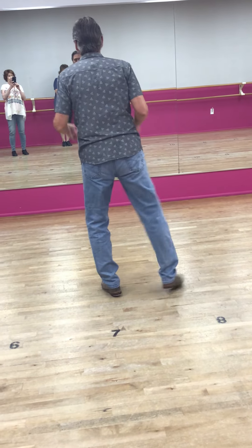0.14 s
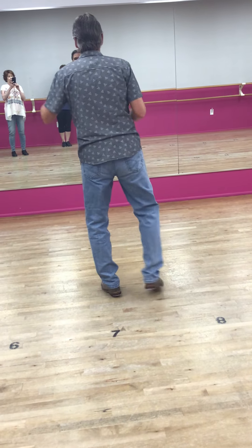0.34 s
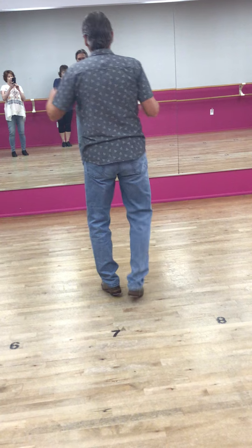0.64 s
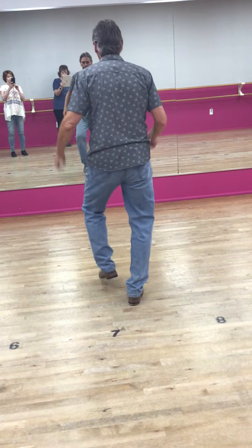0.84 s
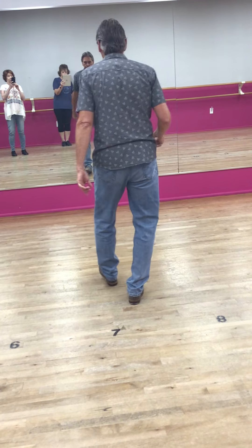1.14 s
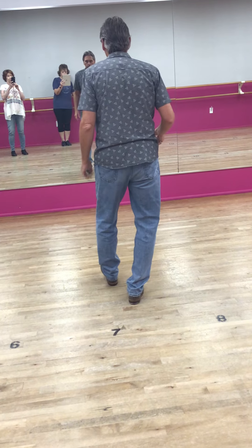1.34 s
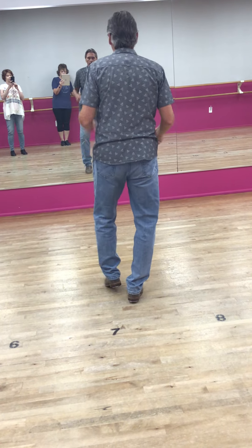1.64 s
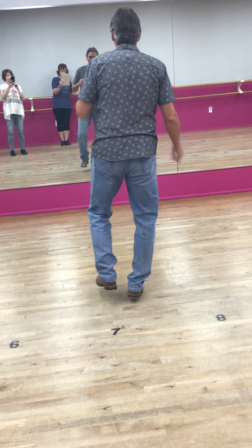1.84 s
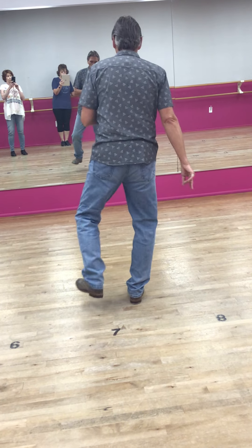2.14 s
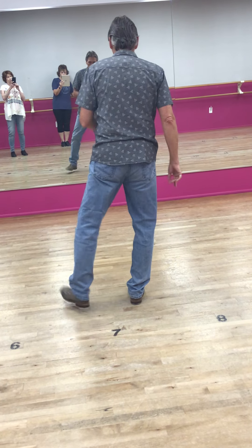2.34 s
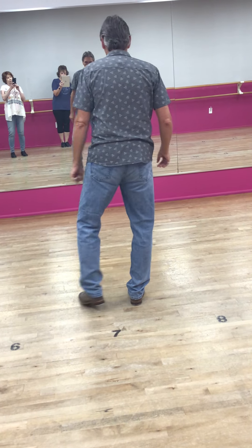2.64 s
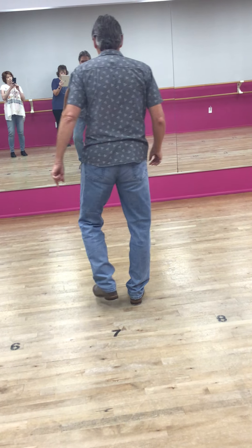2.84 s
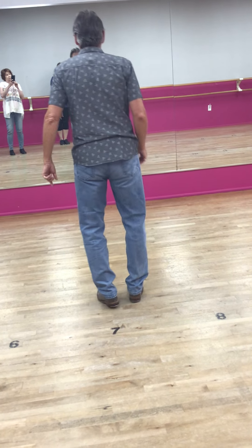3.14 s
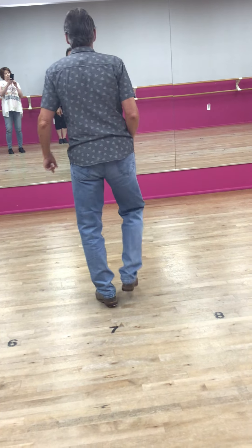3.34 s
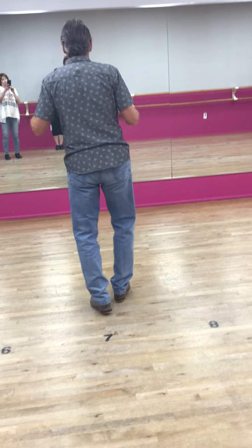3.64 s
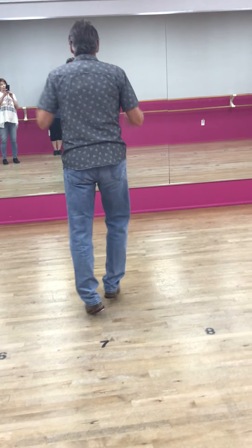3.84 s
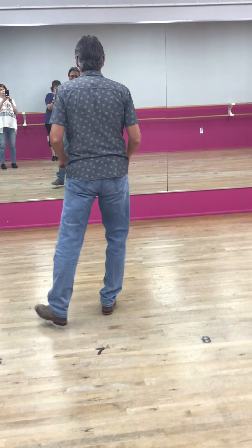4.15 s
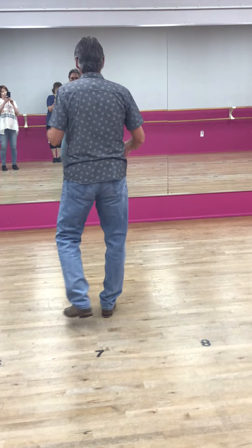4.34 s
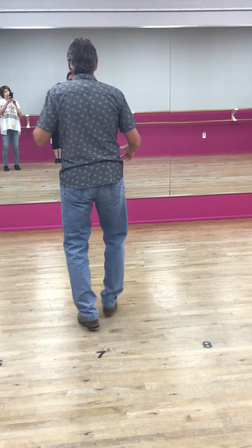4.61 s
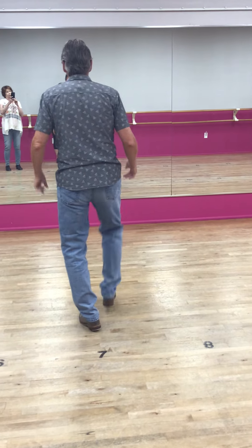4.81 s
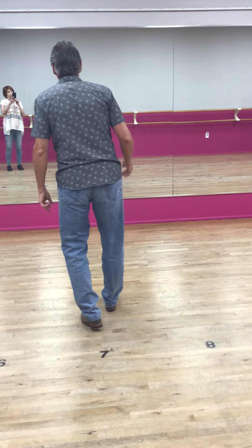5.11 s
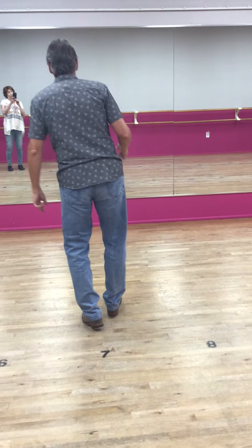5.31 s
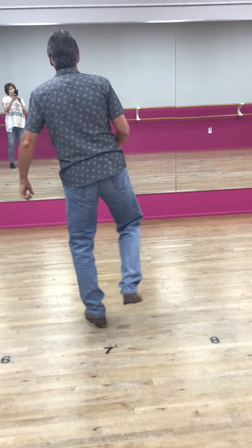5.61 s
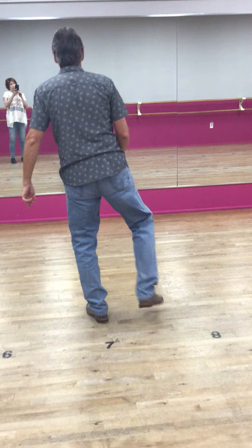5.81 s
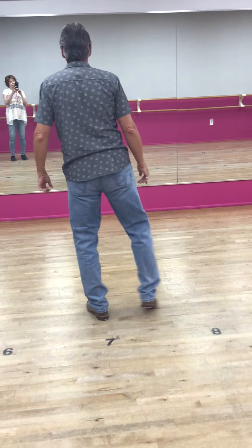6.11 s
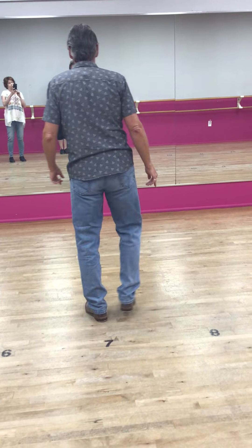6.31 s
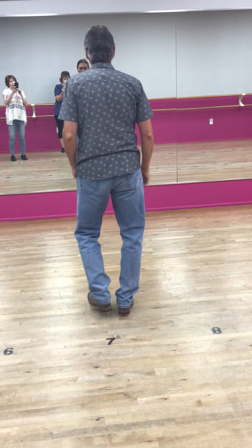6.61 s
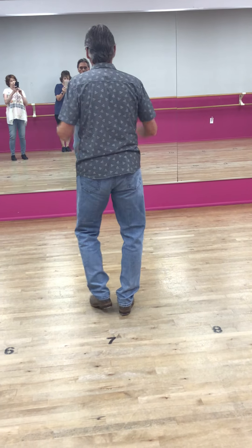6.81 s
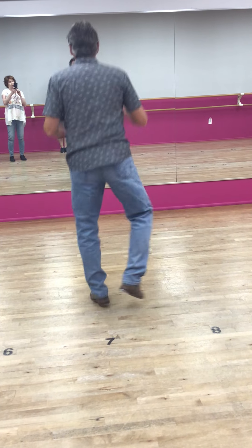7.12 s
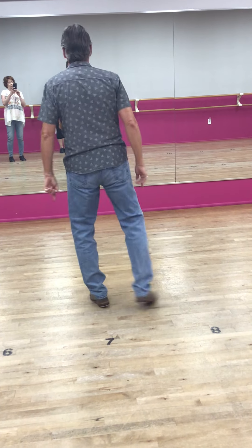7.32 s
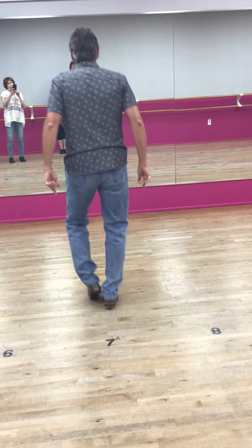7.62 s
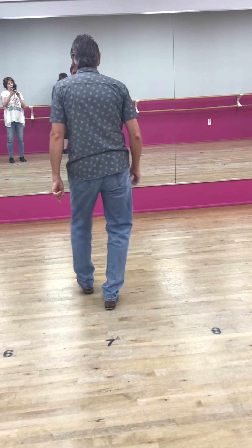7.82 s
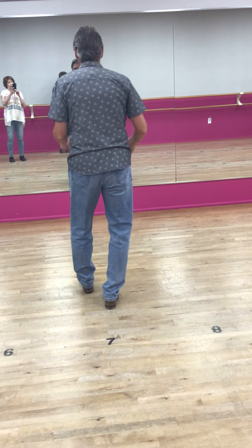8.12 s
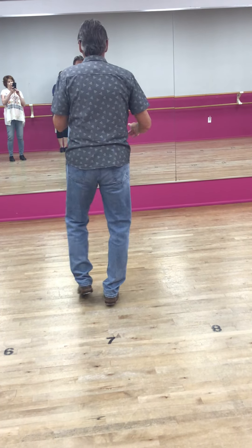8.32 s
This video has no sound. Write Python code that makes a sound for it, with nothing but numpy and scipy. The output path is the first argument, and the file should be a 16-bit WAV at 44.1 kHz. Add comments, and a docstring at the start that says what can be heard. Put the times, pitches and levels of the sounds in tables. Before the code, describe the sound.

Crisp metal-plated shoe taps on hollow wooden boards, two to four a second, ringing briefly off the hard walls of an empty-sounding room.

```python
"""A dancer in tap shoes steps on the sprung wooden floor of a bare studio, a few metres from a phone.
Each blow excites resonances: the steel plates and sole clack, planks knock and boards thud.
Mirror, ceiling and walls return a few sharp echoes, then a dense tail of decaying noise bands.
Soft weight shifts sound the boards alone; faint ventilation is filtered noise, slowly wavering."""
import sys
import numpy as np
from scipy import signal
from scipy.fft import rfft, irfft, next_fast_len
from scipy.io import wavfile
from scipy.ndimage import uniform_filter1d

SR = 44100
rng = np.random.default_rng(int(sys.argv[2]) if len(sys.argv) > 2 else 0)


def wav_out(sig):
    """Save sig, one row per channel (or a flat mono array), as 16-bit PCM at SR to the path in sys.argv[1]."""
    wavfile.write(sys.argv[1], SR, np.round(np.clip(np.atleast_2d(sig).T, -1, 1) * 32767).astype(np.int16))


N = 373086
LEAD = SR // 5  # samples computed ahead of time zero, for a blow that starts earlier
PLACES = 6  # spots on the floor, each with its own room response


def undb(db):
    """Decibel law: level in dB to amplitude gain."""
    return 10 ** (np.asarray(db) / 20)


def ring(modes, db, chance, detune):
    """Modal resonance: power spectrum of struck modes; db is the rms if all came within 10 ms."""
    hz, mode_db, t60 = np.transpose(modes)[:, :, None]
    count = len(hz)
    # each blow shifts the pitches and levels of the modes a little
    hz = hz * (1 + detune * chance[::-1][:count, None])
    mode_db = mode_db + 0.58 * chance[:count, None]
    f = np.fft.rfftfreq(SR // 2, 1 / SR) + 1
    width = np.log(1000) / (2 * t60)
    # contact and plate resonate in series, so the flanks fall steeply
    resonance = 1 / (1 + ((f - hz ** 2 / f) / width) ** 2) ** 2
    power = np.sum(undb(2 * mode_db) / width * resonance, axis=0)
    return power * undb(2 * db) * (SR / 100) * len(f) / power.sum()


def blow(power):
    """Minimum phase: the causal, most sudden sound that has this power spectrum."""
    cepstrum = irfft(np.log(power) / 2)
    half = len(cepstrum) // 2
    # folding the cepstrum onto positive time makes the sound causal
    cepstrum[1:half] *= 2
    cepstrum[half + 1:] = 0
    return irfft(np.exp(rfft(cepstrum)))[:half]


def push(x, seconds):
    """Contact time as a low-pass: a softer contact is a longer, rounder push."""
    w = np.hanning(int(seconds * SR) + 3)
    return np.convolve(x, w / w.sum())[:len(x)]


def late(x, seconds):
    """Pure delay: the same sound, starting later."""
    return np.roll(x, int(seconds * SR))


def add(track, s, x):
    """Superposition: mixes a sound in at a time in seconds."""
    i = LEAD + int(s * SR)
    track[i:i + len(x)] += x[:len(track) - i]


# Modes of the toe and heel plates. Each row: frequency in Hz and T60 in s (both before the
# ratios of each blow), with the relative level in dB between them.
TOE = [(3416, -15, .004), (4317, 3, 0.0021), (6770, -10.5, 0.0021)]
HEEL = [(2890, 4.5, 0.0035), (4900, -11, 0.0032), (5980, -5.5, 0.0018)]
SOLE_T60_S = 0.0043  # before the ring length ratio


def clacks(length, sole_hz, sole_db, pitch, toe_db, heel_db, chance):
    """Sequential impact: sole, heel and toe plate clack; returns their sum and total power spectrum."""
    sole = [(sole_hz, 0, length * SOLE_T60_S)]
    # a plate pressed harder to the floor rings higher; one that leaves at once rings longer
    heel = np.array(HEEL) * (pitch, 1, length)
    toe = np.array(TOE) * (pitch, 1, length)
    x, total = 0, 0
    parts = ((sole, sole_db, 1), (heel, heel_db, -1), (toe, toe_db, 1))
    for modes, db, polarity in parts:
        spectrum = ring(modes, db, chance, 0.0081)
        # the plate edge touches first, so lower parts speak later
        x = x + polarity * late(blow(spectrum), .7 / modes[0][0])
        total = total + spectrum
    return x, total


# Modes of the sprung boards. Each row: frequency in Hz, relative level in dB, T60 in s.
BOARDS = [(126, -2, 0.093), (178, -17, 0.035), (182.2, -5, 0.1), (230, 2, 0.04), (257.3, -1, 0.049),
          (325.7, -3, .06)]


def thud(db, chance, detune, contact_s):
    """Plate vibration: the boards sound their low modes, rounded by the contact time."""
    return push(blow(ring(BOARDS, db, chance, detune)), contact_s)


# High modes of the steel, then modes of the planks. Each row: frequency in Hz, relative level in dB,
# T60 in s.
PLATE = [(8790, 5.5, 0.004), (10800, -8, 0.0029), (12900, -8.5, 0.0025), (15300, -20.5, .003)]
PLANKS = [(410, 6, 0.02), (597, 2.5, 0.011), (740, -1.5, 0.0036), (1190, -19.5, 0.0033)]
SHARED_COLOUR = 0.33  # share of the room's sound that keeps the hollows between the clacks


def tap(row, room_db, chance):
    """Directivity: one blow as sent towards the phone, and averaged over all directions for the room."""
    length, knock_db, sole_hz, sole_db, pitch, toe_db, heel_db, treble_db, thud_db = row
    clack, clack_power = clacks(length, sole_hz, sole_db, pitch, toe_db, heel_db, chance)
    treble = ring(PLATE, treble_db, chance, .02)
    knock = ring(PLANKS, knock_db, chance, .03)
    low = thud(thud_db, chance, 0.011, 0.0021)
    x = clack + blow(treble) + late(blow(knock), 0.00071)
    total = clack_power + treble + knock
    # parts interfere towards the phone, but their powers add over many directions
    interfering = abs(rfft(x, SR // 2)) ** 2
    around = blow(SHARED_COLOUR * interfering + (1 - SHARED_COLOUR) * total + 1e-18)
    # the bass spreads evenly, whichever way the shoe faces
    return x - low, undb(room_db) * around - low


# legs and shoes throw a short rattle after the direct blow
SCATTER_DB, SCATTER_T60_S = -6, 0.04
# nearby surfaces: delay in ms, level in dB before half the room level and a small random change
NEAR_ECHO_MS, NEAR_ECHO_DB = (5.6, 8.3), (-16, -15.5)


def close_by(x, room_db, noise, chance):
    """Scattering and reflection: direct blow, a rattle off legs and shoes, two nearby echoes."""
    path = noise * 1000. ** (-np.arange(len(noise)) / SR / SCATTER_T60_S)
    path = path * undb(SCATTER_DB) / np.sqrt(np.sum(path ** 2))
    path[0] = 1  # direct sound
    for ms, db, c in zip(NEAR_ECHO_MS, NEAR_ECHO_DB, chance):
        path[int(ms * SR / 1000)] += undb(db + room_db / 2 + 2 * c)
    return signal.fftconvolve(x, path)


# Blows of the shoes. Each row: start in seconds, shift of each wall echo from their mean delay in ms,
# ring length ratio, knock level in dB, sole clack in Hz, sole clack level in dB, plate pitch ratio,
# toe plate level in dB, heel plate level in dB, treble level in dB, thud level in dB,
# room level in dB (all of the blow but its thud).
TAPS = [(-0.0602, .15, 0.84, -40, 1550, -33, 1.05, -40, -23, -51.5, -36, 0),
        (0.112, .1, 0.79, -49.5, 1480, -32.5, 1, -50, -33, -55.5, -43.5, -0.5),
        (0.3008, .1, 0.98, -49.5, 1490, -35, 0.95, -27.5, -39, -41, -37.5, 0),
        (0.6757, .1, 1.09, -42.5, 1690, -30, 1.046, -27.5, -40.5, -39.5, -35.5, 2),
        (1.0298, 1.5, 1.13, -43.5, 1210, -51.5, 0.93, -77, -38.5, -59, -34.5, 5.5),
        (1.6749, .8, 0.5, -41.5, 1700, -36, 0.98, -37.5, -39.5, -50, -32, 4),
        (2.0238, .1, 1.24, -48.5, 1190, -51.5, .92, -73, -38.5, -63, -36, -1),
        (2.295, .1, 0.92, -41, 1500, -32, 1.206, -37.5, -29, -52.5, -33.5, -1.5),
        (2.6209, .2, .8, -41, 1650, -33.5, 1.01, -33.5, -37.5, -48, -27, 2),
        (2.972, .1, 0.7, -40, 1240, -34.5, 0.85, -28, -32.5, -43.5, -27, 1.5),
        (3.59, .1, 1.06, -44, 1696, -30, 0.99, -30.5, -39.5, -44.5, -37.5, 1.5),
        (3.907, .1, 0.91, -42, 1680, -34.5, 1.03, -29.5, -49, -41, -31.5, 5),
        (4.0611, .1, 0.96, -41.5, 1420, -37, 1.19, -48, -30.5, -69, -36.5, -1.5),
        (4.2394, .1, 1.08, -44, 1540, -35, 1.03, -26, -40, -39.5, -33, 0.5),
        (4.5587, .1, 0.71, -45, 1680, -34, .97, -30, -56, -48.5, -30, 4),
        (4.8985, 1.5, .8, -42, 2030, -40.5, 0.96, -69, -35.5, -54.5, -33.5, 5.5),
        (5.409, .1, 0.85, -42.5, 1725, -30, 1.035, -28, -35.5, -40.5, -34, 1),
        (5.6761, .1, 0.71, -60, 960, -50.5, 0.76, -55, -46.5, -69, -44.5, 0.5),
        (5.8844, .1, 0.94, -45, 1605, -30, 1, -41.5, -29, -45, -41.5, -1.5),
        (6.1194, .1, 1.34, -51, 1520, -32, 1.01, -30.5, -34.5, -44.5, -40.5, 0.5),
        (6.3802, .1, 0.97, -39, 2030, -32.5, .97, -29.5, -59, -47.5, -32, 2),
        (6.8236, .1, 0.64, -43.5, 1760, -34.5, 1, -36.5, -27.5, -51, -32.5, 1),
        (7.1003, .1, 0.62, -41, 1750, -35.5, 0.97, -34, -27.5, -48.5, -32, 1),
        (7.2023, .1, 1.5, -44, 1640, -32, 1.15, -38, -42.5, -49, -40, -1.5),
        (7.3435, .1, 1.18, -49, 1434, -33.5, .95, -32.5, -53, -52.5, -41, 0.5),
        (7.5752, .1, 0.92, -43, 1670, -28.5, 1.01, -28, -37, -42.5, -37.5, -0.5),
        (7.8437, 1.5, 0.82, -43.5, 1080, -53.5, 0.97, -62, -38.5, -65, -34, 7),
        (8.3122, .1, 0.84, -43.5, 1827, -28, 1, -36, -25, -78, -39, -1)]
WALL_ECHO_MS, WALL_ECHO_DB = 13.5, (-7, -16.5)  # mean delay of a pair of walls; level of each


def taps(near, sent):
    """Specular reflection: adds each blow and its two wall echoes, and sends it into the room."""
    draws = rng.standard_normal((len(TAPS), SR // 40))
    for k, ((s, split_ms, *row, room_db), draw) in enumerate(zip(TAPS, draws)):
        x, around = tap(row, room_db, draw[:6])
        add(near, s, close_by(x, room_db, draw[8:], draw[6:8]))
        # two walls answer together, or apart when the foot lands off centre
        for side, db in zip((-1, 1), WALL_ECHO_DB):
            echo = push(undb(db) * around, 0.0002)
            add(near, s + (WALL_ECHO_MS + side * split_ms) / 1000, echo)
        add(sent[k % PLACES], s, around)


# Lone echoes of far walls: delay in ms before a random shift, and level in dB before a random change.
FAR_ECHO_MS = (21.5, 33, 36.5, 50.5, 56.2)
FAR_ECHO_DB = (-27, -17.5, -17.5, -13.5, -20)
# Dense tail. Each row: frequency in Hz, T60 in s, energy in dB above the sound sent into the room.
TAIL = [(60, 0.48, -1.5), (122, 0.47, 7.5), (247, 0.92, 2.5), (495, 0.87, 2.5), (930, 0.61, 3.5),
        (1950, 0.65, -2.5), (3850, 0.72, -2.5), (8900, 0.54, -2), (16100, 0.35, -4.5)]
TAIL_START_S, TAIL_RISE_S = .011, 0.0034  # onset and time constant of the build-up


def studio():
    """Reverberation: late response from one place, lone echoes in noise that dies band by band."""
    t = np.arange(SR) / SR
    out = np.zeros(SR)
    changes = rng.standard_normal((len(FAR_ECHO_MS), 2))
    for ms, db, (shift, gain) in zip(FAR_ECHO_MS, FAR_ECHO_DB, changes):
        out[int(ms * (1 + shift / 100) * SR / 1000)] = undb(db + 1.5 * gain)
    out = push(out, .0001)

    # reflections come in clumps at first and merge as they multiply
    clumps = np.interp(t, np.arange(700) / 700, rng.standard_normal(700))
    patchy = undb(4.3 * clumps * np.exp(-t / 0.1))
    noise = rng.standard_normal(SR) * patchy
    # even out the power over 50 ms, so that only the clumping remains
    noise = rfft(noise / np.sqrt(uniform_filter1d(patchy ** 2, size=SR // 20)))

    rise = 1 - np.exp(-np.maximum(t - TAIL_START_S, 0) / TAIL_RISE_S)
    hz, t60, db = np.transpose(TAIL)
    octaves = np.log2(np.fft.rfftfreq(SR, 1 / SR) + 1)
    # overlapping triangular bands half an octave apart
    for centre in np.arange(5.5, 15, .5):
        band = irfft(noise * np.clip(1 - 2 * abs(octaves - centre), 0, 1))
        shape = rise * 1000. ** (-t / np.interp(centre, np.log2(hz), t60))
        gain = undb(np.interp(centre, np.log2(hz), db)) / np.sqrt(np.sum(shape ** 2))
        out = out + band * shape * gain
    return out


# Spectrum of the air noise. Each row: frequency in Hz, relative level in dB per Hz.
AIR = [(25, -43), (40, -26.5), (59, -10.5), (75, -12.5), (100, -24), (210, -17), (400, -43.5), (800, -36),
       (3000, -45.5), (8000, -63.5), (16000, -77)]
AIR_DB = -68  # rms level about which the waver moves


def ventilation():
    """Shaped broadband noise: steady rumble with a hump near the mains frequency, wavering slowly."""
    hz, db = np.transpose(AIR)
    size = next_fast_len(N)
    f = np.fft.rfftfreq(size, 1 / SR) + 1
    gain = undb(np.interp(np.log(f), np.log(hz), db))
    x = irfft(rfft(rng.standard_normal(size)) * gain, size)[:N]
    waver = np.interp(np.arange(N), np.linspace(0, N, 25), rng.standard_normal(25))
    return x / x.std() * undb(AIR_DB + 3.4 * waver)


# Soft weight shifts, no steel. Each row: start in seconds, level in dB.
STEPS = [(2.506, -57), (2.832, -48.5), (3.183, -72), (4.45, -53.5), (5.27, -51.5)]


def weight_shifts(near, sent):
    """Soft excitation: a slow contact drives the boards alone, heard directly and through the room."""
    chances = rng.standard_normal((len(STEPS), 6))
    for k, ((s, level_db), chance) in enumerate(zip(STEPS, chances)):
        x = thud(level_db, chance, 0.037, 0.0024)
        add(near, s, x)
        add(sent[k % PLACES], s, x)


FLOOR_LOW_HZ = 98.5  # the boards radiate little below their first mode


def scene():
    """Superposition: early sound, the room's answer by convolution, and the ventilation."""
    near = np.zeros(LEAD + N)
    sent = np.zeros((PLACES, LEAD + N))
    taps(near, sent)
    weight_shifts(near, sent)
    wet = sum(signal.fftconvolve(x, studio())[:LEAD + N] for x in sent)
    floor = signal.butter(4, FLOOR_LOW_HZ, "high", fs=SR, output="sos")
    steps = signal.sosfilt(floor, near + wet)
    return (steps[LEAD:] + ventilation())[None]


TOP_HZ = 16700  # cut-off


def record(dry):
    """Band limiting: a steep elliptic low-pass; nothing is heard above the cut-off."""
    return signal.sosfilt(signal.ellip(10, .2, 70, TOP_HZ, fs=SR, output="sos"), dry)


dry = scene()
out = record(dry)
wav_out(out)
```